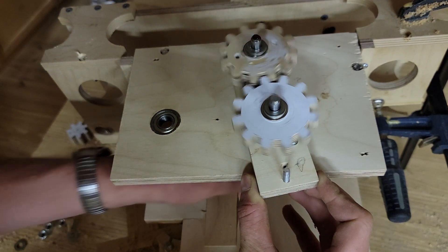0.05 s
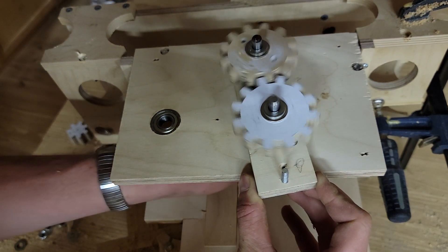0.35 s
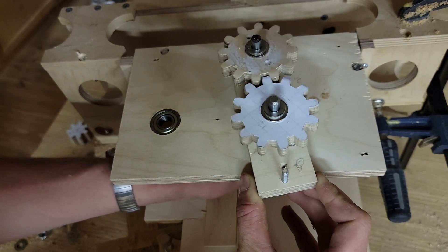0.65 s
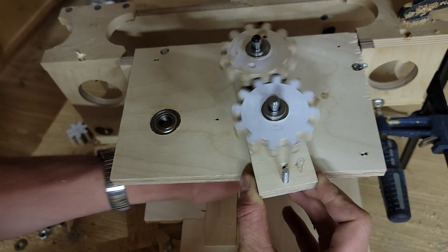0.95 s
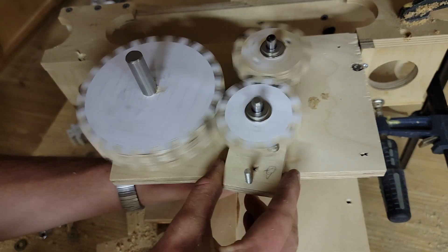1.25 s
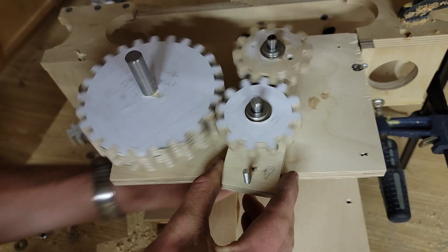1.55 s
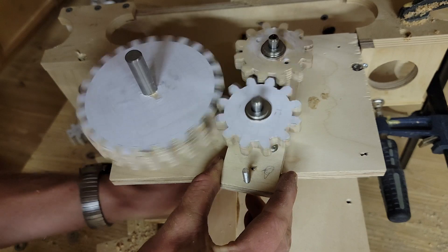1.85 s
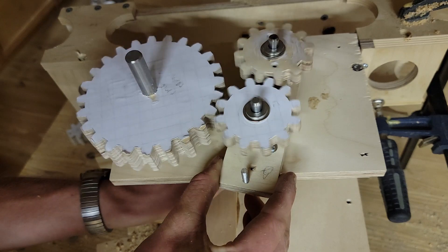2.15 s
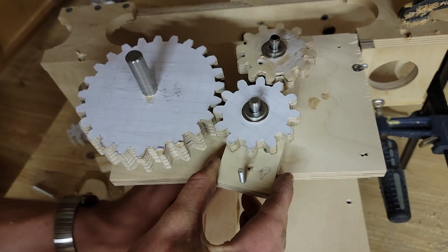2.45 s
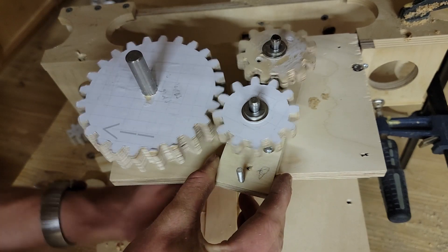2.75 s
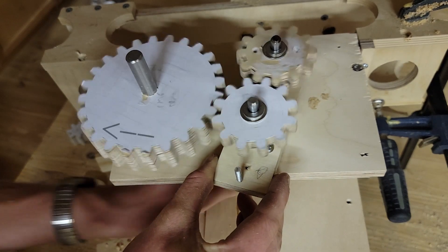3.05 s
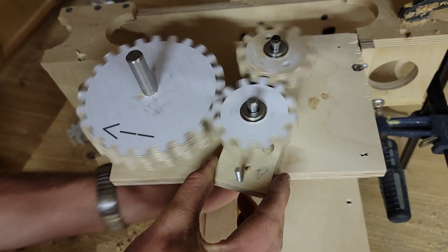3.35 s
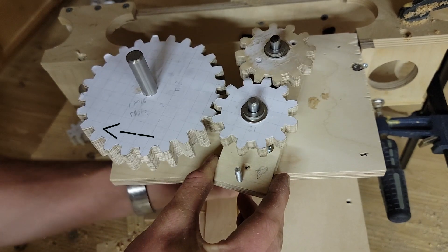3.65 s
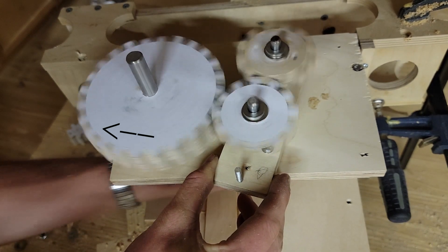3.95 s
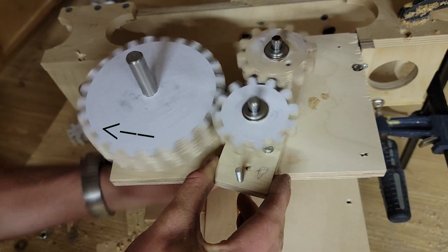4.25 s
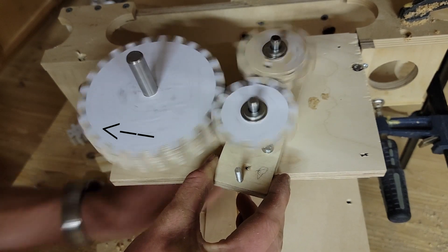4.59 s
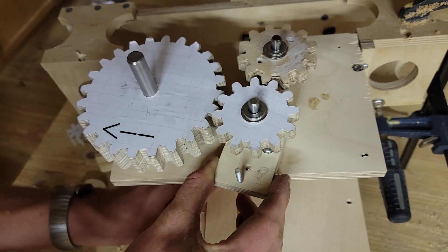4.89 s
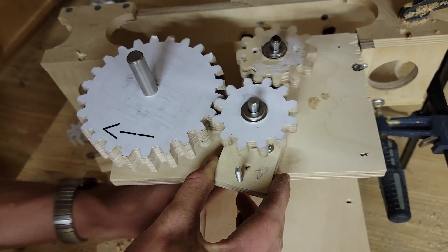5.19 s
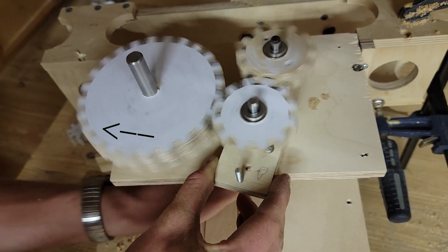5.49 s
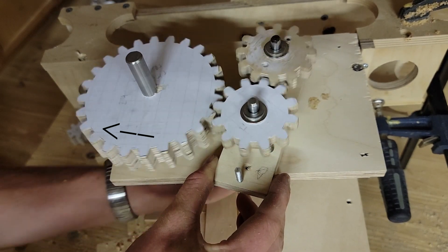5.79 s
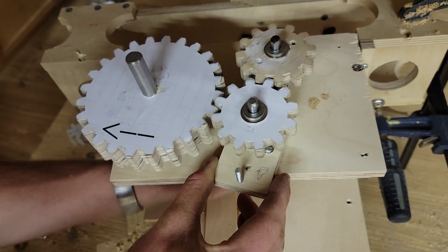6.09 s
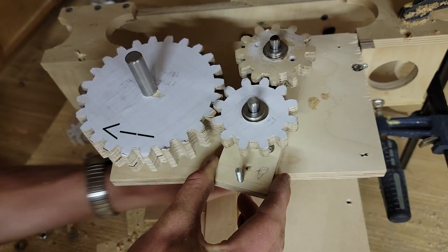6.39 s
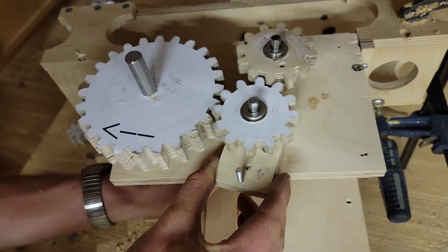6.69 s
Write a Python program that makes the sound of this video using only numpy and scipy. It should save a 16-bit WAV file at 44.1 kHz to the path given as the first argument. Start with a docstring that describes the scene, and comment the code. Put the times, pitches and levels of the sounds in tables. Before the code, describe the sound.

Plywood gears are pushed to and fro by hand, close to the microphone. Their loose teeth click, knock and rebound in uneven clusters, sparse and light at first, then busier and louder. Between the knocks the teeth rub and scuff softly and the wheels rumble faintly on their axles. Heavier knocks put a slight low thud into the workbench. The small workshop adds a short echo.

```python
"""Plywood gears turned by hand

Spur gears on a wooden base plate are pushed to and fro, close by. With each push the loose teeth
knock, rebound and scuff as they mesh; their flanks rub, the wheels rumble on their axles, and the
heaviest knocks thud into the bench. A small workshop answers."""
import sys
import numpy as np
from scipy import signal
from scipy.fft import rfft, irfft, next_fast_len
from scipy.io import wavfile
from scipy.ndimage import uniform_filter1d

SR = 44100
rng = np.random.default_rng(int(sys.argv[2]) if len(sys.argv) > 2 else 0)


def to_wav(sig):
    """Store sig (one row per channel, or 1-D mono) as 16-bit WAV at the path in sys.argv[1].

    Samples outside -1..1 are clipped; the rate is SR.
    """
    pcm = np.clip(np.atleast_2d(sig), -1, 1) * 32767
    pcm = np.round(pcm).astype(np.int16)
    wavfile.write(sys.argv[1], SR, pcm.T)  # frames by channels


N = 296793


def gain_of(db):
    """Decibels to gain."""
    return 10 ** (np.asarray(db) / 20)


def unit_rms(x):
    """Scales to rms 1."""
    return x / np.sqrt(np.mean(x ** 2) + 1e-20)


def curve_at(points, hz):
    """Interpolates a table on a log-frequency axis."""
    points_hz, values = np.transpose(points)
    return np.interp(np.log(hz + 1), np.log(points_hz + 1), values)


def add(mix, start_s, sound):
    """Adds a sound into the mix."""
    span = mix[:, max(round(start_s * SR), 0):][:, :sound.shape[1]]
    span += sound[:, :span.shape[1]]


def decay(x, t60_curve, frame):
    """Lets each frequency die away at its own rate."""
    hz, t, spectra = signal.stft(x, SR, nperseg=frame)
    fade = gain_of(-60 * t / curve_at(t60_curve, hz)[:, None])
    return signal.istft(spectra * fade, SR, nperseg=frame)[1][:, :x.shape[1]]


# Each row: frequency in Hz, left-right coherence 0-1.
COHERENCE = [(200, 0.89), (500, 0.42), (1000, 0.72), (2500, 0.41), (5000, 0.06), (12000, 0.66)]

def cohere(spectra, hz):
    """Makes two independent spectra partly alike, as left and right."""
    left, other = spectra
    alike = np.clip(curve_at(COHERENCE, hz), 0, 1)
    return np.array([left, alike * left + np.sqrt(1 - alike ** 2) * other])


def noise(colour, size, grain=1):
    """Coloured stereo noise, rms 1; grain first breaks it into bursts."""
    fft_size = next_fast_len(size)
    hz = np.fft.rfftfreq(fft_size, 1 / SR)
    spectra = cohere(rfft(rng.standard_normal((2, size)) * grain, fft_size), hz)
    return unit_rms(irfft(spectra * gain_of(curve_at(colour, hz)), fft_size)[:, :size])


def roughness(depth_db, samples):
    """Uneven wood: a gain that wanders within bounds, rms 1."""
    wander = uniform_filter1d(uniform_filter1d(rng.standard_normal(N), samples), samples)
    return unit_rms(gain_of(depth_db * 2 * np.tanh(unit_rms(wander) / 2)))


# Each row: frequency in Hz, relative density in dB.
ROOM_TONE_COLOUR = [(20, -34.5), (55, -0.5), (110, -3.5), (250, -10), (400, -4.5), (520, -6), (700, -1),
                    (1050, -12.5), (1310, 2), (1430, -32.5), (1560, -1.5), (1800, -10), (2700, -8.5),
                    (3200, -13.5), (4300, -7.5), (6900, -20.5), (8500, -39), (16000, -59)]

def room_tone(level_db=-71):
    """The steady hush of the workshop."""
    return gain_of(level_db) * noise(ROOM_TONE_COLOUR, N)


# Each row: frequency in Hz, T60 in seconds.
TAIL_T60 = [(150, 0.18), (500, 0.04), (1200, 0.53), (2700, 0.64), (5000, 0.5), (12000, 0.12)]
# Each row: frequency in Hz, gain in dB.
TAIL_COLOUR = [(150, 1.5), (500, -2.5), (1200, -15.5), (1900, -10), (2700, -13), (3600, -20), (5000, -18),
               (12000, 3)]
# Each row: delay in seconds, gain in dB.
EARLY_ECHOES = [(.0058, -52.5), (.0088, -15.5), (0.015, -19), (0.018, -23.5), (0.023, -17), (.0295, -21),
                (0.037, -17.5)]

def workshop(source, build_s=0.016, skew_s=0.00045, echo_cutoff_hz=3500):
    """Single echoes from bench and shelves, then a short diffuse tail."""
    t, hz = np.arange(SR) / SR, np.fft.rfftfreq(SR, 1 / SR)
    diffuse = irfft(cohere(rfft(rng.standard_normal((2, SR))), hz / 2))
    tail = decay(diffuse, TAIL_T60, frame=256) * (1 - np.exp(-t / build_s))
    tail_energy = SR * curve_at(TAIL_T60, hz) / np.log(1e6)
    response = rfft(tail) * gain_of(curve_at(TAIL_COLOUR, hz)) / np.sqrt(tail_energy)
    for delay_s, db in EARLY_ECHOES:
        arrival_s = delay_s + skew_s * rng.uniform(-1.08, 1, (2, 1))
        response += gain_of(db) * np.exp(-2j * np.pi * hz * arrival_s) / (1 + 1j * hz / echo_cutoff_hz)
    return signal.fftconvolve(source, irfft(response), axes=1)[:, :N]


# Each row: start in seconds, level in dB, offset for the upper modes in dB.
BENCH_THUDS = [(0.633, -64, -16), (1.309, -67, 2), (1.95, -58, 8.5), (2.835, -61, -8), (4.336, -49.5, -3),
               (4.592, -64, 8), (4.697, -61, -0.5), (5.125, -59, -6), (5.665, -71, 0), (6.667, -57, 4)]
# Each row: frequency in Hz, relative level in dB, T60 in seconds.
BENCH_MODES = [(50, 2, 0.19), (74.5, 9, 0.19), (114, 7, 0.18), (151, 1.5, 0.15)]

def bench_thuds(rise_s=0.011, upper_hz=100):
    """The gearbox rocks; the heavy bench takes up the blow slowly and hums low."""
    out, t = np.zeros((2, N)), np.arange(SR // 2) / SR
    for start_s, level_db, upper_db in BENCH_THUDS:
        hum = np.zeros((2, len(t)))
        for hz, mode_db, t60_s in BENCH_MODES:
            envelope = gain_of(mode_db + upper_db * (hz > upper_hz) - 60 * t / t60_s)
            hum += envelope * np.sin(2 * np.pi * (hz * t + rng.random()))
        add(out, start_s, gain_of(level_db) * hum * (1 - np.exp(-t / rise_s)))
    return out


# Each row: start and end in seconds, relative axle rumble and flank rub in dB.
HAND_PUSHES = [(-.05, .49, -76, -72), (0.551, 0.633, -72, -67), (0.776, 1.11, -73, -78),
               (1.275, 1.628, -67.5, -68.5), (1.827, 2.432, -64, -64.5), (2.794, 3.373, -66, -64.5),
               (3.411, 3.627, -62, -59.5), (3.805, 4.094, -58.5, -59.5), (4.275, 4.741, -60.5, -59),
               (5.059, 5.728, -62.5, -61), (5.76, 5.955, -71.5, -65), (6.083, 6.418, -63.5, -65),
               (6.488, 6.75, -66.5, -65)]
# Each row of both: frequency in Hz, relative density in dB.
AXLE_COLOUR = [(25, -33), (50, -3.5), (90, 0), (180, -8.5), (250, 2.5), (320, -4), (410, -2.5), (520, -6.5),
               (660, -0.5), (780, -4.5), (900, -7), (1300, -3.5), (2000, -16.5), (3000, -37.5)]
FLANK_COLOUR = [(700, -21), (1500, -5.5), (2200, -6), (2600, 6.5), (2850, -3.5), (3150, -6.5), (3600, 4),
                (3950, -2.5), (4450, 4), (5600, -15), (6900, -6.5), (7800, -23), (9800, -30.5),
                (16000, -67)]

def friction(trim_db=-1, rise_s=0.01, coast_s=0.061, shake_db=-37, shake_s=0.02):
    """The wheels bump along on their axles; the flanks rub, fibre catching on fibre."""
    t, roll, slide = np.arange(N) / SR, np.zeros(N), np.zeros(N)
    for start_s, end_s, roll_db, slide_db in HAND_PUSHES:
        speed = np.clip((t - start_s) / rise_s, 0, 1) * np.exp(-np.maximum(t - end_s, 0) / coast_s)
        roll = np.maximum(roll, gain_of(roll_db) * speed)
        slide = np.maximum(slide, gain_of(slide_db) * speed)
    shake = np.zeros((1, N))  # each knock jolts the wheels
    for start_s, db, *_ in TOOTH_KNOCKS:
        add(shake, start_s, gain_of(db + shake_db) * np.exp(-t[None, :SR // 2] / shake_s))
    rumble = noise(AXLE_COLOUR, N, roughness(depth_db=6.5, samples=300))
    grain = roughness(depth_db=4, samples=260) * roughness(depth_db=2.5, samples=24)
    rub = noise(FLANK_COLOUR, N, grain)
    return gain_of(trim_db) * (np.hypot(roll, shake) * rumble + slide * rub)


# Each row: start and length in seconds, relative level in dB, pitch in Hz.
TOOTH_SCUFFS = [(-.03, 0.077, -69.5, 4440), (0.294, 0.097, -78, 3570), (0.532, 0.11, -59.5, 4150),
                (0.777, 0.37, -68.5, 2680), (0.806, 0.29, -71, 3510), (1.01, 0.14, -67.5, 6100),
                (1.258, 0.091, -56.5, 4170), (1.422, 0.24, -63.5, 5920), (2.246, 0.18, -52.5, 2810),
                (3.03, 0.087, -56, 4270), (4.44, 0.27, -60, 3900), (4.605, 0.1, -53, 4300),
                (5.284, 0.065, -49.5, 4500), (5.803, 0.071, -54, 3510), (5.907, 0.041, -60, 2970)]

def scuffs(rub_db=-3, ring_db=-4, q_at_3khz=11, swell_power=0.54):
    """A tight tooth scrapes its partner, swelling and fading, and rings at its own pitch."""
    out, t = np.zeros((2, N)), np.arange(N) / SR
    grain = roughness(depth_db=2, samples=40)
    rub, catches = noise(FLANK_COLOUR, N, grain), noise(WEAK_MODE_COLOUR, N, grain)
    for start_s, length_s, db, hz in TOOTH_SCUFFS:
        on = (t > start_s) & (t < start_s + length_s)
        q = q_at_3khz * (3000 / hz) ** 2  # higher scrapes are damped more
        peak = signal.tf2sos(*signal.iirpeak(hz, q, fs=SR))
        ring = unit_rms(signal.sosfilt(np.vstack([peak, peak]), catches[:, on]))
        swell = abs(np.sin(np.pi * (t[on] - start_s) / length_s)) ** swell_power
        out[:, on] += gain_of(db) * swell * (gain_of(rub_db) * rub[:, on] + gain_of(ring_db) * ring)
    return out


# Each row of both: frequency in Hz, relative level in dB. Weak modes crowd between the strong ones.
STRONG_MODES = [(253, -16), (315, -15), (405, -8), (665, -2), (894, -2), (1100, 0), (1270, 0), (1530, -1),
                (1830, -1), (2120, -3), (2510, 3), (2860, 2), (3150, 0), (3470, 1), (4130, 3), (4590, 4),
                (5030, 2), (5860, -10), (7110, -9), (8300, -17), (9960, -21)]
WEAK_MODE_COLOUR = [(150, -22), (350, -40.5), (700, -15.5), (2500, -7.5), (4700, -3), (5700, -1.5),
                    (7400, 1), (9900, -13), (11000, -45), (15000, -44)]
# Each row: frequency in Hz, T60 in seconds.
PLYWOOD_T60 = [(200, 0.12), (600, 0.038), (1200, 0.043), (2500, 0.013), (4500, 0.012), (10000, 0.01)]

def plywood(t, spot_hz, base_width_hz=45, loss=0.045, scatter_db=3, spot_db=5.5, spot_width=0.22):
    """A blow rings the wood briefly; the spot struck favours the modes near its own pitch."""
    hz = np.fft.rfftfreq(len(t), 1 / SR)
    burst = np.zeros((2, len(t)))
    burst[:, t >= 0] = decay(rng.standard_normal((2, np.sum(t >= 0))), PLYWOOD_T60, frame=64)
    drive = cohere(rfft(burst), hz)
    # a short blow feeds all frequencies alike
    drive /= np.sqrt(uniform_filter1d(abs(drive) ** 2, size=21, axis=1) + 1e-12)
    power = gain_of(curve_at(WEAK_MODE_COLOUR, hz)) ** 2
    for mode_hz, db in STRONG_MODES:
        detuning = 2 * (hz - mode_hz) / (base_width_hz + loss * mode_hz)
        power += gain_of(db + scatter_db * rng.standard_normal()) ** 2 / (1 + detuning ** 2)
    hollow = 1 + gain_of(spot_db) / (1 + 2j * (hz - spot_hz) / (spot_width * spot_hz))
    return irfft(drive * np.sqrt(power) * hollow)


# Plate, wheel, tooth, fibres: the hardness 0-1 that wakes each best, then its share in dB.
BEST_HARDNESS = [0, .45, .7, 1]
BLOW_SHARE_DB = [3.5, -2.5, 1, -7]

def part_levels(strength_db, hardness, mismatch_db=36, crush_db=-22, crush_slope=0.23):
    """A dull blow wakes the plate, a sharp one the tooth; a weak one crushes the fibres less."""
    mismatch = abs(hardness - np.array(BEST_HARDNESS))
    levels_db = strength_db + np.array(BLOW_SHARE_DB) - mismatch_db * mismatch
    levels_db[-1] -= crush_slope * max(crush_db - strength_db, 0)
    return levels_db


def chatter(rate_per_s=7, above_rumble_db=9, spread_db=0.5, pan_db=4, max_hardness=0.47):
    """Loose teeth tap lightly and dully at random during each push."""
    blows = []
    for start_s, end_s, rumble_db, _ in HAND_PUSHES:
        length_s = end_s - start_s
        for place, firmness, force, side in rng.random((round(length_s * rate_per_s), 4)):
            strength_db = rumble_db + above_rumble_db + spread_db * (2 * force - 1)
            levels_db = part_levels(strength_db, max_hardness * firmness)
            spot_hz = np.interp(firmness, [0, 1], [425, 1340])
            blows.append((start_s + place * length_s, levels_db, spot_hz, pan_db * (2 * side - 1)))
    return blows


# Each row: start in seconds, strength in dB.
FIBRE_SNAPS = [(1.6058,-67),(1.8754,-52.5),(1.945,-34),(2.3454,-54),(2.827,-45),(2.849,-53.5),(3.3583,-50.5),(3.443,-60.5),(3.464,-51.5),(3.9332,-52.5),(3.946,-53.5),(4.105,-58.5),(4.296,-49.5),(4.333,-48),(4.355,-56),(4.634,-44),(5.087,-52),(5.1,-41),(5.119,-47),(5.133,-47),(5.2998,-47),(5.4,-56),(5.473,-58),(5.635,-52),(6.154,-55),(6.25,-45.5),(6.3965,-51.5),(6.5406,-51.5),(6.6118,-48)]
# Plate, wheel, tooth, fibres: share of a snap in dB.
SNAP_SHARE_DB = [-3.5, -6.5, 4, 2.5]

def fibre_snaps(spot_hz=13360):
    """A tiny fibre catches on a tooth edge and snaps, ringing very high."""
    return [(start_s, db + np.array(SNAP_SHARE_DB), spot_hz, 0) for start_s, db in FIBRE_SNAPS]


# Each row: start in seconds, strength in dB, hardness 0-1, spot pitch in Hz, left over right in dB.
TOOTH_KNOCKS = [(0.2199,-37.5,0.26,1280,0),(0.416,-64.5,0.055,398,3),(0.605,-57.5,0.046,317,1.5),(0.7684,-37.5,0.33,1740,4.5),(.841,-51,0.16,640,5),(.884,-62.5,.03,640,4),(1.084,-55,0.17,840,3),(1.3002,-26,0.28,1150,2),(1.317,-41.5,.36,1813,-7.5),(1.4935,-50.5,0.16,1040,1),(1.509,-42,0.41,2630,5),(1.5858,-39,0.27,990,-0.5),(1.8145,-50.5,0.15,1446,-2),(1.864,-42.5,0.27,1410,2),(1.8912,-34.5,0.27,1260,0.5),
                (1.932,-17.5,0.46,3260,1),(1.9413,-17,0.51,4240,-2),(1.9448,-25.5,0.24,570,1.5),(2.2397,-31.5,.34,2470,1),(2.278,-34,0.29,660,-2.5),(2.398,-40.5,0.54,4150,-1),(2.8263,-22,0.51,2100,0),(2.8298,-33.5,0.21,624,1),(2.849,-32.5,0.33,2250,-2),(2.859,-37,0.34,1520,3),(2.9824,-44.5,.3,1390,-1),(3.0068,-26,.33,1370,2),(3.0403,-42,0.46,2520,0),(3.0639,-39.5,0.39,2530,-4),(3.0779,-36,0.54,4260,1),(3.2241,-33.5,0.34,1105,-3),(3.336,-52,0.086,1120,3),
                (3.4818,-19.5,.52,4100,-0.5),(3.5647,-35.5,0.29,4130,5),(3.5921,-26.5,0.35,2720,2),(3.627,-42.5,.7,4160,-1),(3.6444,-47.5,.7,4180,-2),(3.7916,-45.5,0.62,4300,-1),(3.83,-34.5,0.7,4200,1.5),(3.851,-25.5,0.3,1150,-1),(4.0029,-39,0.58,4160,1.5),(4.034,-32,0.52,2400,0),(4.045,-38,0.59,4860,0),(4.078,-39.5,0.29,1090,5),
                (4.318,-22,.44,3580,2),(4.3229,-17,.52,2800,-2),(4.333,-38,0.4,2600,3),(4.3536,-33,0.53,2600,-6),(4.4937,-38,0.3,1100,-5),(4.588,-18.5,0.59,4430,-0.5),(4.609,-24,0.71,5000,-2.5),(4.6757,-26,0.46,2460,1),(4.6826,-21.5,0.47,2670,-3),(4.769,-52.5,0.14,900,-1),(4.9433,-48.5,0.29,695,4),
                (5.0596,-40.5,0.33,1790,-5),(5.077,-26.5,0.27,670,0),(5.0958,-18.5,0.45,2340,0),(5.126,-34.5,.24,420,0),(5.147,-34.5,0.48,4200,3.5),(5.253,-35,.52,4500,2),(5.2998,-35,0.63,4040,-1),(5.3075,-30,.75,3900,-2),(5.4308,-39,0.28,1527,4),(5.4483,-28.5,0.32,2770,0),(5.4959,-51.5,.12,694,-1),(5.5409,-40,0.3,684,3),(5.593,-48.5,.07,706,5),(5.6024,-32,.56,4540,0),(5.6591,-16.5,0.54,4700,-1),
                (6.146,-28,0.36,1650,-0.5),(6.243,-41,0.58,3000,7),(6.3499,-38,.64,4400,4),(6.6278,-34.5,0.32,763,0),(6.6574,-14,0.49,3330,0.5),(6.662,-12.5,0.47,2900,1)]

def knocks():
    """A tooth takes up its play and lands."""
    return [(start_s, part_levels(db, hardness), spot_hz, pan_db)
            for start_s, db, hardness, spot_hz, pan_db in TOOTH_KNOCKS]


# Plate, wheel, tooth, fibres: the five edges of their bands in Hz, then their rise times in seconds.
BAND_EDGES_HZ = [150, 1500, 3500, 6500, 15000]
BAND_RISE_S = [0.00083, 0.00028, 0.00075, 0.00028]

def strike(blows, lead_in_db=-18, lead_in_s=0.0061, softening=0.9):
    """Each blow rings the four parts; a faint noise swells just before it and fades after it."""
    out, t = np.zeros((2, N)), np.arange(-1024, 3072) / SR
    attack = (t >= 0) & (t < 0.0047)
    bands = [signal.butter(5, edges_hz, "bandpass", fs=SR, output="sos")
             for edges_hz in zip(BAND_EDGES_HZ, BAND_EDGES_HZ[1:])]
    for start_s, levels_db, spot_hz, pan_db in blows:
        ring = plywood(t, spot_hz)
        lead_in_envelope = gain_of(lead_in_db) * np.std(ring[:, attack]) * np.exp(-abs(t) / lead_in_s)
        lead_in = lead_in_envelope * noise(WEAK_MODE_COLOUR, len(t))
        # a blow that hardly wakes the next higher part also favours the lower modes of this one
        steps_db = np.diff(levels_db, append=levels_db[-1])
        corners_hz = BAND_EDGES_HZ[1:] * np.clip(gain_of(softening * steps_db), 0.37, 2)
        for band, corner_hz, rise_s, db in zip(bands, corners_hz, BAND_RISE_S, levels_db):
            lowpass = signal.butter(2, corner_hz, fs=SR, output="sos")
            onset = 1 - np.exp(-np.maximum(t, 0) / rise_s)
            part = signal.sosfilt(np.vstack([band, lowpass]), ring * onset + lead_in)
            part /= np.sqrt(np.mean(part[:, attack] ** 2, axis=1, keepdims=True))
            add(out, start_s + t[0], part * gain_of(db + np.array([[pan_db], [-pan_db]]) / 2))
    return out


def scene(blows_db=-3):
    """The gearbox on its bench in the workshop."""
    blows = knocks() + fibre_snaps() + chatter()
    gearbox = gain_of(blows_db) * strike(blows) + friction() + scuffs()
    return gearbox + workshop(gearbox) + bench_thuds() + room_tone()


# Each row: frequency in Hz, lead of the left port in radians.
PORT_LEAD = [(300, 0), (560, -.6), (850, .3), (1300, .6), (1900, 2.1), (2500, .6), (3200, 2), (3900, 3.4),
             (5000, 2), (8000, .9), (14000, 1.6)]
# Each row: frequency in Hz, left over right in dB.
PORT_PAN = [(100, -1.2), (350, .5), (700, -2), (1300, -2), (2400, -1), (4400, 5), (8000, 5), (15000, 2)]

def record(dry, cutoff_hz=15900):
    """Two microphone ports differ in phase and colour; a steep low-pass follows."""
    size = next_fast_len(N + SR // 10)
    hz = np.fft.rfftfreq(size, 1 / SR)
    left = gain_of(curve_at(PORT_PAN, hz) / 2) * np.exp(0.5j * curve_at(PORT_LEAD, hz))
    ports = np.array([left, 1 / left]) / np.sqrt((abs(left) ** 2 + abs(left) ** -2) / 2)
    heard = irfft(rfft(dry, size) * ports, size)[:, :N]
    lowpass = signal.firwin(511, cutoff_hz, window=("kaiser", 9), fs=SR)
    return signal.oaconvolve(heard, lowpass[None], "same")


dry = scene()
out = record(dry)
to_wav(out)
```